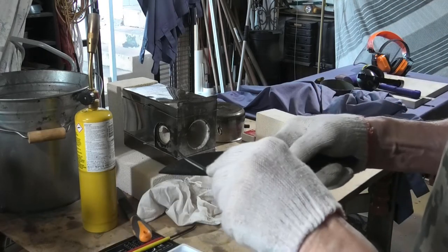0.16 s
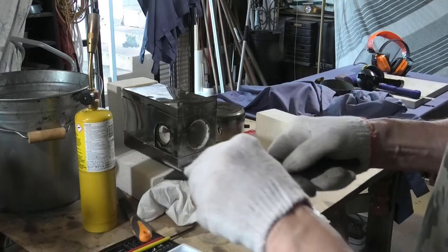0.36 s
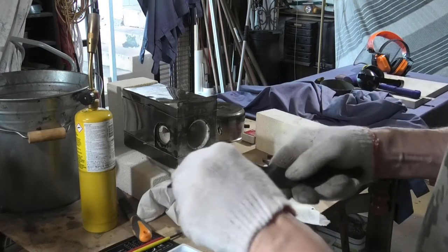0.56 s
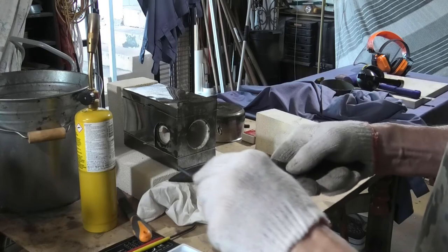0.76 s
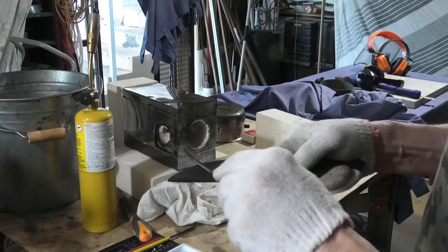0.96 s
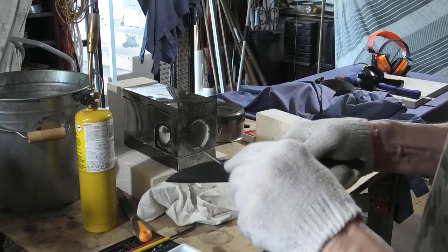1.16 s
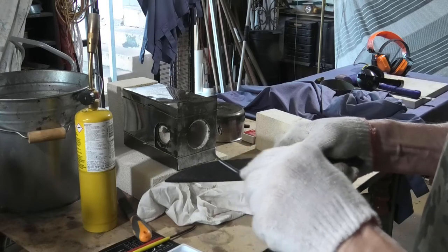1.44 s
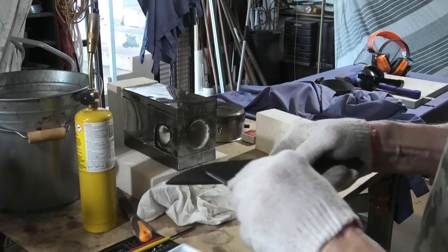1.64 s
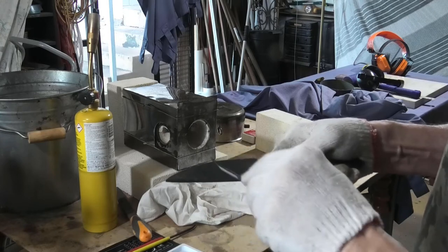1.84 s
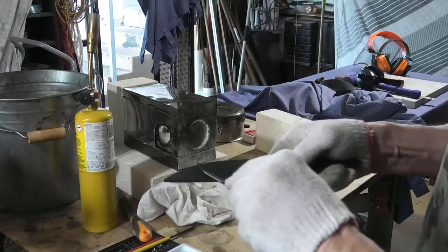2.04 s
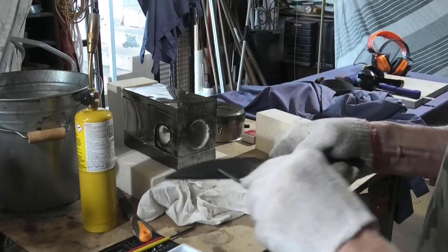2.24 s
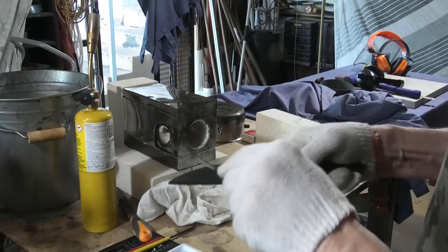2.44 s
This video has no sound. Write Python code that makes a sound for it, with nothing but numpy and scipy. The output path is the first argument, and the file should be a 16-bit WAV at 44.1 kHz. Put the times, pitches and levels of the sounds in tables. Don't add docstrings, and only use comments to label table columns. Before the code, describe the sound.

Metal file scraping a hard blade in brief raspy skids, each starting with a sharp tick.

```python
import sys
import numpy as np
from scipy import signal
from scipy.fft import rfft, irfft
from scipy.io import wavfile
from scipy.ndimage import uniform_filter1d

SR = 44100
rng = np.random.default_rng(int(sys.argv[2]) if len(sys.argv) > 2 else 0)


def put_to_file(sound):
    columns = np.atleast_2d(sound).T
    safe = np.clip(columns, -1, 1)
    whole_steps = np.round(safe * 32767)
    wavfile.write(sys.argv[1], SR, whole_steps.astype(np.int16))


def nominal_scale(level):
    x = np.asarray(level, float) / 20
    return 10 ** x


N = 114660


def evened(x):
    return x / np.sqrt(np.mean(x ** 2) + 1e-20)


def read(points, hz):
    f, value = np.transpose(points)
    return np.interp(np.log(hz + 1), np.log(f + 1), value)


def coloured(x, db_at):
    hz = np.fft.rfftfreq(len(x), 1 / SR)
    return irfft(rfft(x) * nominal_scale(db_at(hz)), len(x))


def stroke(curve, colour, place_db, spine_db):
    # t/s, level/dB, push on the spine/dB
    catches = [(.2358, -9, -8), (.2482, -16, 5), (.3462, -6, -1), (.3518, -6, -1), (.3745, -7, -6),
               (.3935, -6, -10), (.4003, -9, -8), (.4165, -11, -6), (1.5735, -11, -9), (1.577, -12, -9),
               (1.6752, -18, -3), (1.696, -20, -3), (1.7163, -20, 3), (1.7462, -23, 2), (1.9295, -10, -12),
               (1.933, -10, -12), (1.937, -13, -12), (2.2802, -5, -12), (2.3065, -12, -8),
               (2.3435, -14, -3), (2.3565, -19, 10)]
    teeth_per_s, tooth_spread_db, chatter_db = 7600, 7, 2
    wander_s, wander_db = 0.12, 2
    skate_db, skate_s, skate_top_hz = -1.5, 0.0068, 18500

    s, pressure_db, grip_db, load_db = np.transpose(curve)
    t = np.arange(s[0], s[-1], 1 / SR)
    chance, size, sign, shape = rng.random((10500, 4))[:len(t)].T

    size_db = tooth_spread_db * np.minimum(-np.log(size), 3)
    teeth = (chance < teeth_per_s / SR) * nominal_scale(size_db) * np.sign(sign - 0.5)
    chatter = evened(uniform_filter1d(uniform_filter1d(sign - 0.5, size=110), size=110))
    edge = np.clip(np.minimum(t - t[0], t[-1] - t) / 0.00053, 0, 1)
    teeth = evened(teeth) * edge * nominal_scale(np.interp(t, s, pressure_db) + chatter_db * chatter)
    grip = teeth * nominal_scale(np.interp(t, s, grip_db))
    knock = teeth * nominal_scale(np.interp(t, s, load_db))
    for at, db, knock_db in catches:
        catch = nominal_scale(db) * (np.arange(len(t)) == round((at - s[0]) * SR))
        teeth = teeth + catch
        knock = knock + nominal_scale(knock_db) * catch

    turn = (t - t[0]) / wander_s + np.arange(3)[:, None] / 3
    spots = 2 / 3 * np.cos(np.pi * turn) ** 2
    out = sum(bodies(w * teeth, w * grip, w * knock, colour, place_db, spine_db, wander_db)
              for w in spots)
    for k in range(4):
        chosen = teeth * ((shape * 4).astype(int) == k)
        bare = signal.fftconvolve(chosen, rasp(skate_s, colour[1]))
        out[0, :len(bare)] += nominal_scale(skate_db + spine_db[6]) * bare
    low_pass = signal.cheby2(10, 40, skate_top_hz + 500, fs=SR, output="sos")
    return s[0], signal.sosfilt(low_pass, out)


def tap(row, colour, place_db, spine_db):
    blow_s, tick_s = 0.00096, 0.0034
    start, db, crack_db, bench_db, tilt_db = row
    blow = 0.12 * rng.standard_normal(400) * np.exp(-np.arange(400) / SR / blow_s)
    blow[0] = 1
    grip = blow * nominal_scale(bench_db - 3)
    knock = grip * nominal_scale(spine_db[5])
    out = bodies(blow, grip, knock, colour, place_db, spine_db)
    out[0, :1200] += nominal_scale(crack_db) * rasp(tick_s, tilt_db)
    return start, nominal_scale(db + 9) * out


def rasp(decay_s, tilt_db):
    # f/Hz, level/dB
    contact_colour = [(1000, -13.5), (1500, 1.5), (2000, -59), (2700, 3), (3500, -4.5), (5400, -2),
                      (11000, 2), (16000, -25.5)]

    def level_db(hz):
        return read(contact_colour, hz) + tilt_db * np.log2((hz + 500) / 7000)

    h = coloured(rng.standard_normal(1200), level_db)
    h = h * np.exp(-np.arange(1200) / SR / decay_s)
    return h / np.linalg.norm(h)


def bodies(drive, grip, knock, colour, place_db, spine_db, wander_db=0):
    # f/Hz, level/dB, time to fall 60 dB/s
    file_modes = [(5200, -4, .02), (5340, -5, .08), (5445, -4, .07), (5530, -6, .07), (5640, -6, .06),
                  (7077, -5, .06), (7160, -4, .07), (8212, 0, .08), (8300, -4, .02), (8465, -4, .07),
                  (10000, -10, .03), (11060, -2, .04), (11200, -4, .03), (13370, -5, .05)]
    blade_modes = [(3880, -10, .025), (4780, -8, .035), (6050, -7, .04), (6295, -3, .04), (6452, -3, .04),
                   (6750, -8, .04), (8070, -4, .04), (8195, -3, .04), (8432, -5, .04), (9016, -3, .045),
                   (10426, -4, .04), (10818, -4, .04), (12300, -2, .025), (13495, -3, .035)]
    bench_modes = [(1375, -11, .03), (1500, -15, .02), (1648, 0, .06), (1738, -2, .065), (2170, -13, .05)]
    table_modes = [(494.4, 5.5, 0.037), (806, -1.5, 0.049), (1073, -0.5, 0.0088)]
    # f/Hz, level/dB, time to fall 60 dB/s
    spine_modes = [(2402, -9, .05), (2575, -2, .04), (2635, -3, .045), (2690, -1, .045), (2790, -6, .035),
                   (2900, -6, .035), (3075, -9, .04), (3860, -15, .02), (4100, -15, .025), (4420, -17, .03),
                   (4765, -11, .035), (5030, -12, .04), (14650, -14, .02), (15750, -10, .02)]
    place_hz = [5400, 7100, 8300, 11100, 13400]
    spine_hz = [2400, 2650, 3000, 4000, 4900, 15000]

    def lean(modes, db_per_octave, centre_hz):
        return [(hz, db + db_per_octave * np.log2(hz / centre_hz), t60) for hz, db, t60 in modes]

    blade_db, tilt_db, share, bench_tilt_db, table_db = colour
    file = np.pad(ring(file_modes, share, wander_db), (0, 2000))
    file = coloured(file, lambda hz: np.interp(hz, place_hz, place_db))[:6000]
    blade = ring(lean(blade_modes, tilt_db, 7000), share, wander_db)
    steel = file + nominal_scale(blade_db) * blade
    bench = ring(lean(bench_modes, bench_tilt_db, 1600), 1, wander_db / 2)
    spot_db = np.delete(spine_db, [5, 6])
    spine = ring([(hz, db + np.interp(hz, spine_hz, spot_db), t60) for hz, db, t60 in spine_modes],
                 1, wander_db / 2)
    held = signal.fftconvolve(grip, bench) + signal.fftconvolve(knock, spine)
    table = signal.fftconvolve(grip, nominal_scale(table_db) * ring(table_modes))
    return np.array([signal.fftconvolve(drive, steel), held, table])


def ring(modes, share=1, wander_db=0):
    contact_cycles = 1.5
    t = np.arange(6000) / SR
    parts = []
    for hz, db, t60 in modes:
        fade = nominal_scale(db - 60 * t / (t60 * share))
        build_up = -np.expm1(-t * hz / contact_cycles)
        parts.append(fade * np.sin(2 * np.pi * hz * t) * build_up / np.sqrt(t60))
    parts = np.array(parts)
    gains = nominal_scale(wander_db * rng.uniform(-1.7, 1.2, len(modes)))
    return gains @ parts / np.linalg.norm(parts.sum(0))


def workshop(x):
    # f/Hz, time to fall 60 dB/s
    walls = [(1000, 0.085), (3000, 0.32), (7000, 0.31), (14000, 0.15)]
    # f/Hz, side level/dB
    room_width = [(1500, 2.5), (6000, -10), (13000, -2.5)]
    first_echo_s = 0.0012
    wall_echo_s, wall_echo_width_s, wall_echo_db = 0.0155, 0.003, 6

    echoes = np.zeros((2, 22000))
    at = np.arange(0, 21980, 14) + rng.integers(0, 14, (2, 1570))
    np.put_along_axis(echoes, at, rng.choice([-1., 1.], at.shape), 1)
    lag = np.arange(22000) / SR
    bump = np.exp(-((lag - wall_echo_s) / wall_echo_width_s) ** 2)
    echoes *= np.clip(lag / first_echo_s - 0.5, 0, 1) * nominal_scale(wall_echo_db * bump)
    hz, t, z = signal.stft(echoes, SR, nperseg=256)
    z[1] *= nominal_scale(read(room_width, hz))[:, None]
    fade = nominal_scale(-60 * t / read(walls, hz)[:, None])
    tail = signal.istft(z * fade, SR, nperseg=256)[1]
    mid, side = signal.fftconvolve(x[None], tail / np.linalg.norm(tail[0]), axes=1)[:, :N]
    return np.array([mid + side, mid - side])


def air():
    # f/Hz, level/dB
    wash_colour = [(15, -47), (25, -21.5), (181, 1), (320, -6.5), (453, -6), (600, -7), (814, -11),
                   (909, -7.5), (2000, -16.5), (2600, -47), (4400, -114)]
    hiss_colour = [(1180, -29), (2000, 0.5), (2440, -4), (3120, -5), (5120, -16.5), (6820, -10.5),
                   (9010, -13.5), (14900, -12.5), (16000, -35)]
    # f/Hz, likeness (0 to 1)
    likeness = [(40, .35), (80, .62), (170, .85), (350, .68), (700, .55), (1410, .5), (3100, .16),
                (6820, .95), (15000, .2)]
    wash_db, hiss_db, patch_db, hiss_top_hz = -43.5, -54.0, 1.0, 15750

    frames, hz = N // 256 + 5, np.fft.rfftfreq(1024, 1 / SR)
    a, b, c, d, patches = rng.standard_normal((frames, 513, 5)).T
    patches = uniform_filter1d(uniform_filter1d(patches, size=6, axis=0), size=12, axis=1)
    same = np.clip(read(likeness, hz), -1, 1)[:, None]
    left = a + 1j * b
    right = same * left + np.sqrt(1 - same ** 2) * (c + 1j * d)
    z = np.array([left, right]) * nominal_scale(patch_db * evened(patches))

    def part(table, keep):
        gain = (nominal_scale(read(table, hz)) * keep)[:, None]
        return evened(signal.istft(z * gain, nperseg=1024, noverlap=768)[1][:, :N])

    low = hz < 2000
    wash = nominal_scale(wash_db) * part(wash_colour, low)
    return wash + nominal_scale(hiss_db) * part(hiss_colour, ~low & (hz < hiss_top_hz))


def add(mix, s, sound):
    part = mix[:, round(s * SR):][:, :sound.shape[1]]
    part += sound[:, :part.shape[1]]


def scene():
    # t/s, blow level/dB, crack level/dB, bench thud level/dB, tilt/dB per octave
    landings = [
        (0.2211, -10.5, 8, -8.5, 0.5),
        (0.337, -27, 15, -17, -1),
        (1.56, -9, 2, -4, -1),
        (1.6512, -27, -4, 0, -6),
        (1.9157, -9, 6.5, 0.5, 6),
        (2.0452, -24.5, -4, 6, -30),
        (2.2751, -4, 6, -3.5, 22),
    ]
    # t/s, pressure/dB, grip on the bench/dB, load on the spine/dB
    strokes = [
        [(.226, -32.5, -28, -17), (.24, -30, -32, -24), (.262, -45, -28, -23)],
        [(.336, -24, -6, 0), (.347, -20.5, -2.5, 0), (.366, -23.5, -1.5, 1), (.378, -21, -3.5, -17),
         (.394, -20.5, -9.5, -10), (.43, -26, -7.5, -12), (.456, -29, -7.5, -6), (.484, -33, -9.5, 0.5),
         (.572, -46.5, -5, -13)],
        [(1.566, -42, -3, -17), (1.58, -34, -22, -34), (1.605, -45, 0, -6)],
        [(1.649, -38, -5, -6), (1.678, -33.5, -11.5, -3.5), (1.715, -34.5, -11, 1.5), (1.745, -44.5, -1, 1),
         (1.762, -55, -19, 0)],
        [(1.922, -24, -28, -26), (1.94, -49, -25, -23), (1.968, -36.5, -1, 1), (1.985, -57, -16, -12)],
        [(2.043, -27, 0, 0), (2.05, -34, -5.5, 0.5), (2.066, -33, -27, -30)],
        [(2.28, -24.5, -34, -30), (2.31, -28.5, -19, -7), (2.345, -30, -12.5, -1.5), (2.36, -35.5, -10, 1.5),
         (2.372, -32.5, -22, -0.5)],
    ]
    # blade ring/dB, tilt/dB per octave, ring length under the grip (share),
    # bench tilt/dB per octave, table rumble/dB
    stroke_colour = [(-3, -4.5, 2.2, 3, -44), (2, -1, 0.7, 22, -11.5), (-6, -4, 1.46, -9, -40),
                     (-3, -6, 1.05, -25, -34), (-1.5, -2, 1.4, -16, -38), (-8.5, -4.5, 0.75, 9, -34),
                     (-3, -4, 0.52, -1, -21)]
    place_levels = [(-2, 5.5, -4, -14, -18), (-5, 0.5, -34, 1, -33), (-1, 4.5, 0, 10.5, 9),
                    (0.5, 1, -41, -0.5, -1.5), (0.5, 7.5, 2.5, 1, 6.5), (-7, -4, -28, -20, -4),
                    (2, -4, -8, 0.5, -21)]
    # level/dB near five low frequencies,
    # knock of the landing/dB, bare rasp/dB, top pair of modes/dB
    spine_levels = [(-32, 3.5, -1.8, 5, 2, 10.5, -10, -15), (-1, 3, 1, -4, 0, 0, -4, 1),
                    (4.5, 0.1, -1.7, 2, -11, 0.1, -7, -10), (0, 3, 1, -2, 2, 3, -3, -14),
                    (11, 0.1, -9, 0.1, -18, 0.1, 1.5, -6), (0, 4, -1, -1, -2, 4, -1, -14),
                    (0, 0.9, 1, 17, 3.5, -3, -5, -2)]
    body_low_hz, body_top_hz, table_low_hz = 1100, 18000, 420
    room_db, bench_pan_db = -9.5, 1.44

    work = np.zeros((3, N))
    for landing, curve, *shade in zip(landings, strokes, stroke_colour, place_levels, spine_levels):
        add(work, *tap(landing, *shade))
        add(work, *stroke(curve, *shade))
    body_band = signal.butter(4, [body_low_hz, body_top_hz], "band", fs=SR, output="sos")
    steel, bench = signal.sosfilt(body_band, work[:2])
    table = signal.sosfilt(signal.butter(4, table_low_hz, "high", fs=SR, output="sos"), work[2])
    near = steel + (bench + table) * nominal_scale([[-bench_pan_db], [bench_pan_db]])
    return near + nominal_scale(room_db) * workshop(steel + bench + table) + air()


def roll_off(x):
    return signal.sosfilt(signal.butter(12, 16810, fs=SR, output="sos"), x)


def record(dry):
    # t/s, level/dB
    duck = [
        (.352, -8),
        (.373, -18),
        (.46, -18),
        (.52, -6),
        (.57, -5.5),
    ]
    duck_low_hz, duck_top_hz, mic_top_hz = 65, 580, 16150
    masked_hz, masked_db = 14500, -22.5

    def band(lo_hz, hi_hz, order):
        return signal.sosfiltfilt(signal.butter(order, [lo_hz, hi_hz], "band", fs=SR, output="sos"), dry)

    def power(x):
        return abs(uniform_filter1d((x ** 2).mean(0), size=500)) + 1e-14

    bass = band(duck_low_hz, duck_top_hz, order=3)
    top = band(masked_hz, 20000, order=12)
    share_db = 10 * np.log10(power(top) / power(band(2000, masked_hz, order=2)))
    lost = uniform_filter1d(np.clip((masked_db - share_db) / 2, 0, 1), size=300)
    bass_db = np.interp(np.arange(N) / SR, *np.transpose(duck), left=0, right=0)
    ducked = dry - lost * top - bass * (1 - nominal_scale(bass_db))
    mic = signal.firwin(401, mic_top_hz, window=("kaiser", 6), fs=SR)
    mix = signal.oaconvolve(ducked, mic[None], "same")
    return roll_off(mix)


dry = scene()
out = record(dry)
put_to_file(out)
```